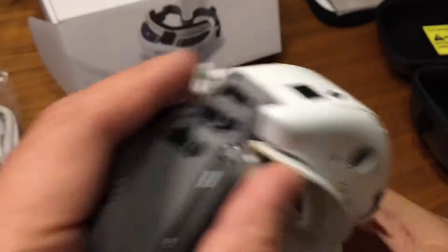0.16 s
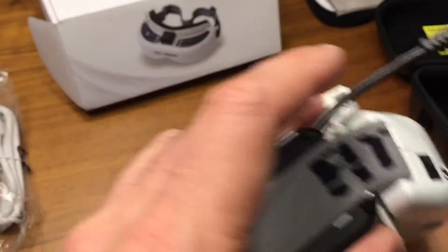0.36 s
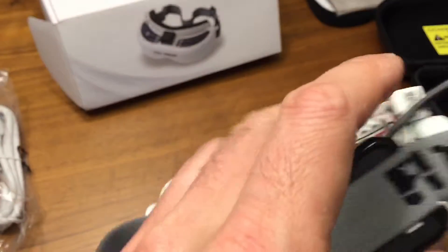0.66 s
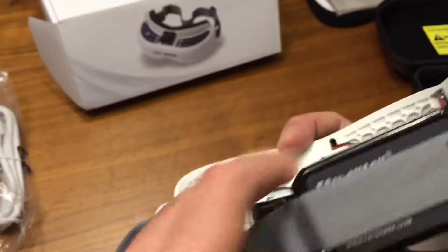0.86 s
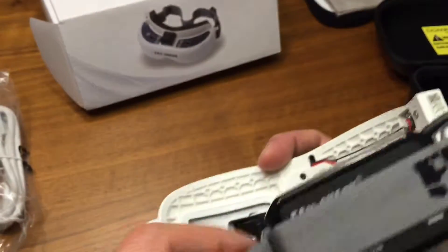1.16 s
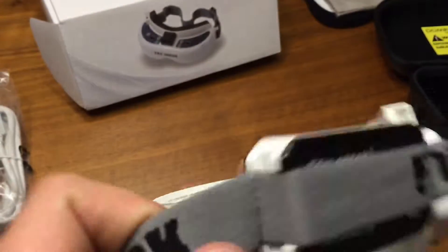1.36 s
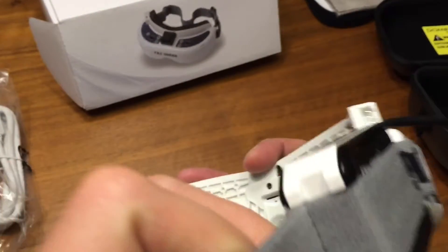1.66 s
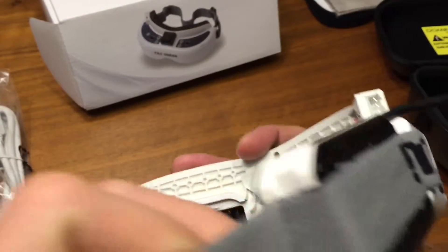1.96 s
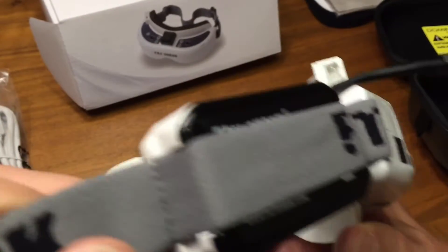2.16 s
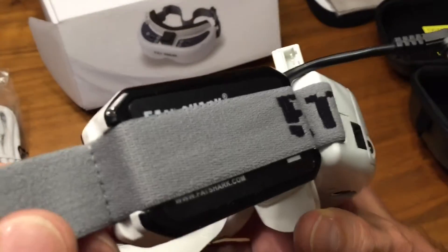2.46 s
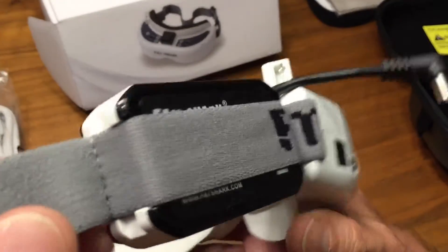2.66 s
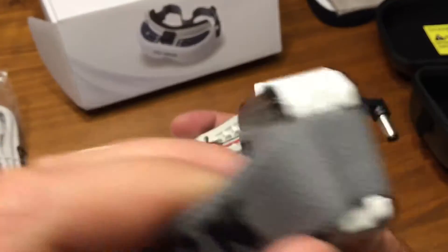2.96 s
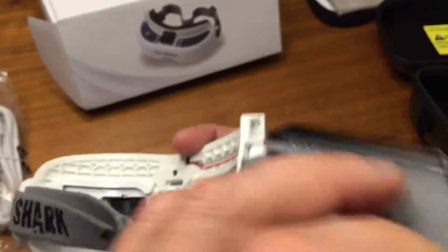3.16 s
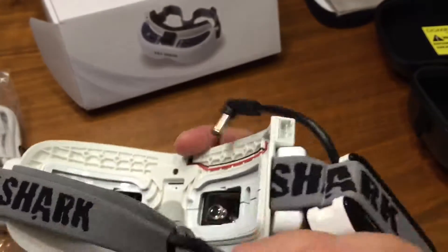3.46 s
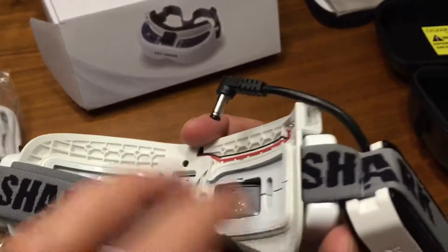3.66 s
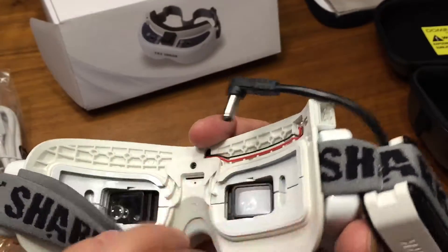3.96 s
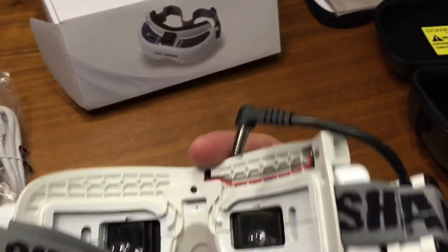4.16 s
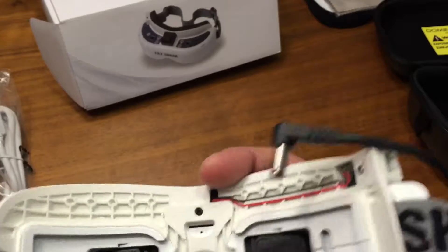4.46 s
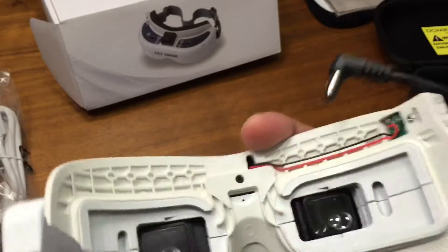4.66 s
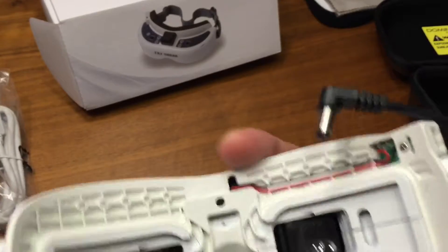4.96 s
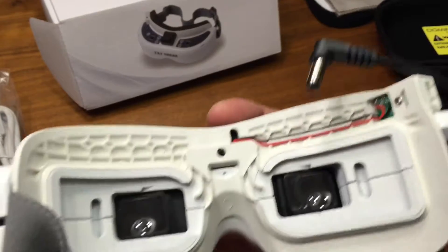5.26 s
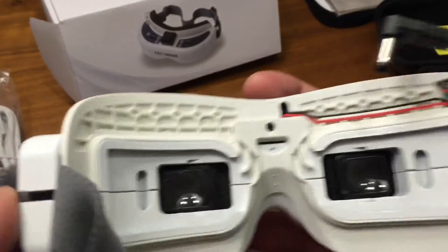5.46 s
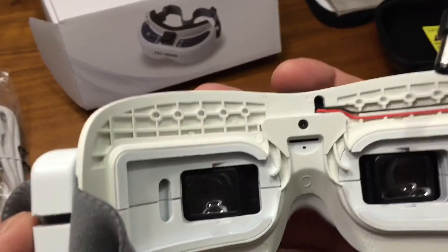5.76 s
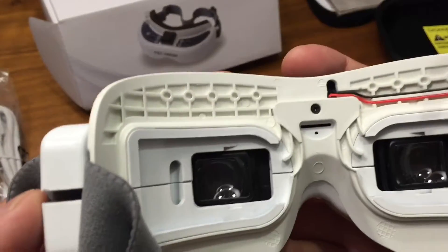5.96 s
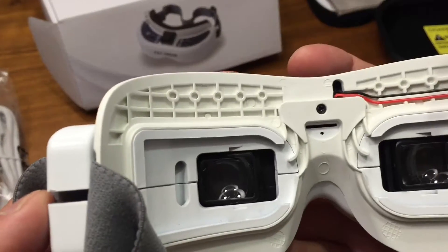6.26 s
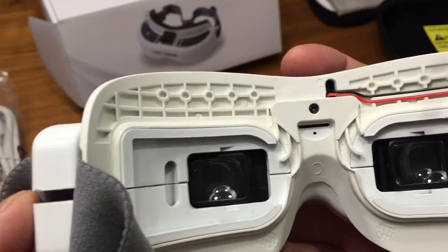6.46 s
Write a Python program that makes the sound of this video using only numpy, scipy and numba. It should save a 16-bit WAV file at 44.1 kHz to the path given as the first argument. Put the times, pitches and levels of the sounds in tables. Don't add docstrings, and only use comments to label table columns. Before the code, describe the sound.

Close to a phone in a small room, hands turn hard plastic goggles over. Faint, jerky rubs ring the shell with a few light clicks. After a quieter spell, a case knocks in the hand, then breaks loose in a loud, bright clatter with quick bounces. Afterwards come drier strap hiss, short scrapes, a firm knock and soft bumps, thinning out over low hum and microphone hiss.

```python
import sys
import numpy as np
from scipy import signal
from scipy.fft import rfft, irfft
from scipy.io import wavfile
from scipy.ndimage import uniform_filter1d
from numba import njit

SR = 44100
rng = np.random.default_rng(int(sys.argv[2]) if len(sys.argv) > 2 else 0)


def bounce(signal):
    frames = np.transpose(np.atleast_2d(signal))
    limited = np.clip(frames, -1, 1)
    pcm = np.round(limited * 32767).astype(np.int16)
    wavfile.write(sys.argv[1], SR, pcm)


def gain_from_db(level_db):
    decades = np.asarray(level_db, float) / 20
    return 10 ** decades


N = 291942
T = np.arange(N) / SR

# [f/Hz, width/Hz, level/dB]
PANELS = [(820, 280, -6.5), (1210, 180, 4.5), (1613, 250, -8), (1850, 260, 1.5), (2250, 280, 7.5)]
SHELL = [(2900, 230, 6), (3450, 740, 5.5), (4200, 430, 4), (4950, 600, -1.5)]
RIBS = [(5820, 1500, 4.5), (6800, 660, -6), (8700, 2400, 1.5)]
FIBRES = [(11770, 1900, 2.5), (13600, 1500, 0), (15200, 2500, -1.5)]
# [t/s, panel f/Hz, shell f/Hz, panels against shell level/dB]
GRIP = [(.1, 1500, 3494, 2.5), (.42, 1940, 3404, -2.5), (.8, 2050, 3918, 5), (0.881, 2100, 5000, -3),
        (1.029, 2200, 3400, 1), (1.2, 1350, 3483, -4.5), (1.6, 1450, 3670, -0.5), (2.7, 1500, 3470, -5.5),
        (3.0, 1109, 3200, 1.5), (3.131, 1250, 4200, -4.5), (3.26, 2180, 3450, 1.5),
        (3.451, 1850, 3600, -0.5), (3.97, 1427, 2900, -2.5), (4.47, 2250, 3490, 3.5),
        (4.64, 1775, 3807, 3.5), (4.74, 1500, 4200, -1), (5.03, 1610, 4200, -1.5), (5.55, 2300, 3310, -3)]
# [t/s of full pressure, ring level/dB,
# swell t/s, fade t/s, fibre hiss against ring level/dB]
STROKES = [(.002, -63, .05, 0.12, -10.5), (0.069, -71, 0.058, 0.6, -6), (.14, -70, 0.27, 0.031, 7),
           (0.384, -61, 0.037, 0.056, -17.5), (0.456, -61, 0.046, 0.059, -21),
           (.57, -75, 0.11, 0.17, -18), (.658, -69.5, 0.067, 0.071, 2), (.74, -78, 0.062, .2, -17),
           (.81, -67.5, 0.19, 0.11, -4.5), (0.862, -60.5, .04, 0.084, -1),
           (.95, -69, 0.14, 0.12, -10), (1.014, -58, 0.039, 0.05, -7.5),
           (1.09, -69, 0.11, 0.017, -10), (1.212, -65.5, 0.11, 0.26, -11.5),
           (1.318, -64, 0.21, 0.092, -11), (1.416, -65, 0.1, 0.038, -10),
           (1.47, -68.5, .1, 0.045, -3), (1.502, -62.5, 0.0098, 0.15, -7.5),
           (1.6, -73, .3, 0.028, -10), (1.82, -78, .8, 0.44, -8), (2.186, -75, 0.19, 0.027, -13),
           (2.674, -66.5, .012, 0.091, -28), (2.739, -59, 0.083, 0.051, -5.5),
                    (2.909, -64.5, 0.043, 0.12, -0.5), (2.961, -62, .07, 0.072, -18),
                    (3.05, -57, 0.04, 0.35, -9), (3.155, -51, 0.2, .065, -10),
                    (3.25, -45, 0.028, 0.075, -25.5), (3.32, -45.5, 0.19, 0.069, -13),
                    (3.373, -39.5, 0.019, 0.081, -9), (3.44, -55.5, .2, 0.117, -14.5),
                    (3.49, -52, .1, 0.049, -22), (3.6, -80.5, 0.25, .1, -6.5),
                    (3.96, -59, 0.027, 0.039, -7), (4.001, -58.5, 0.056, 0.025, -1.5),
           (4.208, -73.5, 0.02, .05, -12), (4.27, -76, 0.044, 0.39, -4),
                    (4.39, -73.5, 0.49, 0.066, 0.5), (4.483, -68, .03, 0.32, 5),
                    (4.51, -60, 0.026, 0.027, 8.5), (4.55, -60.5, 0.11, 0.074, -7),
                    (4.624, -52.5, 0.042, 0.064, -4), (4.714, -48.5, 0.045, 0.06, -5.5),
                    (4.76, -54, 0.089, 0.016, -0.5), (4.8, -72.5, .1, .15, -14),
                    (4.851, -52, 0.014, 0.027, -8), (4.889, -67.5, 0.14, 0.067, 1),
                    (4.97, -68, 0.12, .08, -1), (5.032, -56, 0.037, 0.014, -1.5),
                    (5.086, -63, 0.012, 0.02, 9), (5.142, -69.5, 0.2, 0.06, 9.5),
                    (5.269, -69.5, 0.55, 0.032, -6), (5.32, -74, 0.28, .3, -2),
                    (5.409, -68.5, 0.064, 0.21, 4), (5.523, -64, 0.068, 0.077, 7.5),
                    (5.568, -60.5, 0.094, .065, -5), (5.636, -73, 0.0079, .015, 6)]
# [t/s, peak level/dB, favoured f/Hz, low level/dB, treble level/dB]
TICKS = [(0.0419, -32, 4850, -15, 1.5), (0.665, -33.5, 3930, -11.5, -3.5), (1.2068, -45.5, 3250, -9, -13),
         (1.2257, -57, 3100, 5, -10), (1.4092, -47.5, 3550, -24, -17), (1.517, -50.5, 6950, -6, 5.5),
         (2.669, -64, 1660, 10, -9), (2.6917, -51, 2070, 1, -15), (2.7259, -53, 2700, -15, -7),
         (2.9082, -50, 1140, 14, -8), (3.0173, -53, 1010, 11.5, -3), (3.6302, -59, 1010, 2, -22),
         (3.8661, -55, 1170, -9, -6.5), (3.8998, -55, 2600, -17.5, 1.5), (3.982, -47.5, 5400, 1, 9),
         (4.003, -52, 5540, 5, 9.5), (4.262, -52.5, 2280, -11, -3.5), (4.7458, -48, 6930, -9, 7.5),
         (5.0832, -49, 5200, -17.5, 5), (5.27, -45.5, 3320, -21, -9)]
# [t/s, peak level/dB, favoured f/Hz, low level/dB, treble level/dB]
KNOCKS = [
    (3.0488, -33.5, 3070, -16, -19),
    (3.0658, -35.5, 3250, -7.5, -17.5),
    (3.1376, -32.5, 2690, -6, -13.5),
    (3.1528, -38, 3370, -10.5, -7),
    (3.1722, -29.5, 1125, -4, -3),
    (3.205, -36.5, 2843, -14.5, -16),
    (4.762, -43.5, 1683, 5.5, 4.5),
    (4.8569, -27, 2690, -7, -7.5),
]
# [t/s, peak level/dB, favoured f/Hz, low level/dB, treble level/dB]
CLATTER = [(3.2204, -7, 3430, -25, -13.5), (3.2308, -15.5, 3500, -23, -11), (3.235, -21, 3210, -22.5, -12),
           (3.239, -22, 3480, -19.5, -16), (3.298, -23.5, 6900, -19, 5), (3.3014, -21, 3300, -23.5, -6),
           (3.31, -21.5, 4020, -18.5, -10), (3.3379, -38, 1120, 0.5, -7), (3.35, -9.5, 5800, -12.5, 4.5),
           (3.3573, -29, 1758, -5.5, 1.5), (3.3627, -21.5, 5800, -3, 9.5),
           (3.3964, -23.5, 1720, -12.5, -1.5), (3.3971, -15.5, 1780, -6.5, -12),
           (3.447, -29, 1740, -4.5, -9.5), (3.473, -39, 1984, 6.5, -5.5)]
# [f/Hz, level/dB per Hz]
PLASTIC = [(590, -37), (1000, -10.5), (1370, -6.5), (1700, -2.5), (2980, -6.5), (3630, -2), (4820, -4.5),
           (5610, -9.5), (6850, -6.5), (7970, -11), (9070, -7), (10200, -15.5), (11700, -11.5),
           (15000, -17.5), (16500, -33)]
# [t/s, peak level/dB, f/Hz, time to fall 60 dB t/s]
BUMPS = [(0.56, -49.5, 196, 0.073), (1.005, -56, 603, 0.062), (1.212, -57, 385, 0.11),
         (1.391, -53, 902, 0.034), (2.906, -33.5, 723, 0.031), (2.912, -39, 1060, 0.046),
         (3.172, -41, 400, 0.019), (3.205, -39.5, 234.3, .04), (4.549, -53.5, 194, 0.17),
         (4.629, -53, 70.5, 0.16), (4.716, -24, 480, 0.004), (4.763, -32.5, 114, 0.08),
         (4.855, -44, 485, 0.013), (5.242, -42.5, 487, 0.0082), (5.241, -49.5, 1040, 0.024)]
# [f/Hz, time to fall 60 dB t/s, level/dB]
ROOM = [(700, 0.12, -15.5), (1500, 0.22, -31.5), (2780, 0.15, -26.5), (6040, .32, -21.5),
        (12000, 0.15, -25.5)]
# [f/Hz, level/dB per Hz]
HOUSE = [(12, -66.5), (20, -31.5), (29, -44.5), (44, -5.5), (118, -8.5), (157, -2.5), (248, -11),
         (274, -12.5), (464, -19.5), (506, -21), (600, -29), (780, -48.5), (1320, -120)]
# [f/Hz, level/dB per Hz]
HISS = [(350, -33), (600, -1.5), (739, -5), (885, -5.5), (1300, -6), (1420, -10), (1540, -7), (1820, -7.5),
        (3000, -9.5), (3790, -11), (4800, -12), (5520, -12), (8840, -16), (15200, -18.5), (16500, -34.5)]
# [f/Hz, width/Hz, level/dB]
MIC_DIPS = [(4900, 370, -2.5), (10460, 600, -4)]

HOUSE_DB, HISS_DB = -69.5, -73
STROKE_DROP_DB = 20
RIB_DB, RIB_PER_FIBRE = 3, 0.63
PANEL_FOLLOW, PANEL_EVEN_DB = 0.8, -61
FLEX = 0.035
WAVER_DB = 3.4
FREE_DB, FREE_WIDTH = -5, 0.1
TICK_T60_S, KNOCK_T60_S, CLATTER_T60_S = 0.023, 0.0105, 0.022


def rubbing():
    push = rng.standard_normal(N)
    jerk_db = 2.2 * np.minimum(rng.exponential(size=N // 12 + 1), 5)
    size = np.repeat(gain_from_db(jerk_db), 12)[:N]

    def jerks():
        return size * np.roll(push, rng.integers(N))

    grip_db = 0.55 * walk(60) + 0.92 * walk(200)
    ring_db, fibre_db = pressure()
    grip_s, panel_hz, shell_hz, panel_db = np.transpose(GRIP)
    lag_db = (PANEL_FOLLOW - 1) * np.maximum(ring_db - PANEL_EVEN_DB, -3)
    groups = [(SHELL, 0, np.interp(T, grip_s, shell_hz)),
              (PANELS, np.interp(T, grip_s, panel_db) + lag_db, np.interp(T, grip_s, panel_hz)),
              (RIBS, RIB_DB + RIB_PER_FIBRE * fibre_db, None),
              (FIBRES, fibre_db, None)]
    out = 0
    for modes, group_db, free_hz in groups:
        flex = 1 + FLEX * walk(9) * (modes is not FIBRES)
        body, power = 0, 0
        for hz, width_hz, db in modes:
            damped_db = 0
            if free_hz is not None:
                damped_db = np.minimum(18 * abs(np.log2(hz / free_hz)), 8.5)
            gain = gain_from_db(db - damped_db + WAVER_DB * walk(18))
            mode = gliding_ring(jerks(), hz * flex, width_hz / hz)
            body = body + gain * unit(ring(mode, hz, 4.5 * width_hz))
            power = power + gain ** 2
        body = body / np.sqrt(power)
        if free_hz is not None:
            song = gliding_ring(jerks(), free_hz, FREE_WIDTH)
            body = body + gain_from_db(FREE_DB + WAVER_DB * walk(23)) * unit(song)
        out = out + body * gain_from_db(ring_db + group_db + grip_db)
    return out


def pressure():
    t = T[::32]
    ring_power, fibre_sum = 1e-12, 0
    for s, db, swell_s, fade_s, fibre_db in STROKES:
        away = np.maximum((s - t) / swell_s, (t - s) / fade_s)
        power = gain_from_db(2 * (db - STROKE_DROP_DB * away))
        ring_power = ring_power + power
        fibre_sum = fibre_sum + power * fibre_db
    return np.interp(T, t, 10 * np.log10(ring_power)), np.interp(T, t, fibre_sum / ring_power)


def clicks():
    out = np.zeros(N)
    for rows, t60 in ((TICKS, TICK_T60_S), (KNOCKS, KNOCK_T60_S), (CLATTER, CLATTER_T60_S)):
        for s, db, hz, low_db, high_db in rows:
            add(out, s - 0.0003, gain_from_db(db) * contact(hz, low_db, high_db, t60))
    return signal.sosfilt(signal.butter(4, 850, "high", fs=SR, output="sos"), out)


def contact(hz, low_db, high_db, t60):
    t = np.arange(2048) / SR
    spread, size, phase = rng.random((3, 70))
    f = 1000 + 15300 * np.linspace(0, 1, num=70) ** 1.5 + 200 * (spread - 0.5)
    plastic_hz, plastic_db = np.transpose(PLASTIC)
    gain = gain_from_db(np.interp(np.log(f), np.log(plastic_hz), plastic_db) - 2.6 * size)
    nearby = abs(np.log(f / hz)) < 0.3
    gain = np.append(gain, gain_from_db(8.5 - 0.45 * high_db) * gain[nearby].max())
    f, phase = np.append(f, hz), np.append(phase, 0)
    fade = np.log(1000) / (t60 * (3000 / f) ** 0.6)
    waves = np.sin(2 * np.pi * (f[:, None] * t + phase[:, None]))
    modes = gain[:, None] * waves * np.exp(-fade[:, None] * t)
    low, high = f < 2000, f >= 5500
    out = 0
    for group, db in ((low, low_db), (~low & ~high, 0), (high, high_db)):
        part = modes[group].sum(axis=0) * np.minimum(t / 0.000083, 1)
        out = out + gain_from_db(db) * part / abs(part).max()
    return out


def bumps():
    out, t = np.zeros(N), np.arange(8192) / SR
    for s, db, hz, t60 in BUMPS:
        modes = 0
        for ratio, mode_db in ((1, 1.0), (0.584, -8), (1.3, -6.5)):
            modes = modes + gain_from_db(mode_db) * np.sin(2 * np.pi * hz * ratio * t)
        swell = 1 - np.exp(-4 * hz * t)
        add(out, s, gain_from_db(db - 3.0) * modes * swell * np.exp(-np.log(1000) * t / t60))
    return out


def room(x):
    t = np.arange(SR // 2) / SR
    tail = 0
    for hz, t60, db in ROOM:
        band = unit(ring(rng.standard_normal(len(t)), hz, hz * 1.2))
        tail = tail + gain_from_db(db) * band * np.exp(-np.log(1000) * t / t60)
    onset = np.clip((t - 0.002) / 0.0048, 0, 1)
    return signal.fftconvolve(x, tail * onset * gain_from_db(-25))[:N]


def house_hum():
    return gain_from_db(HOUSE_DB + 0.47 * walk(0.42) + 0.8 * walk(27)) * coloured(HOUSE)


def microphone_hiss():
    return gain_from_db(HISS_DB + 0.41 * walk(0.7)) * coloured(HISS)


def unit(x):
    return x / np.sqrt(np.mean(x ** 2))


def ring(x, hz, width_hz):
    return signal.lfilter(*signal.iirpeak(hz, hz / width_hz, fs=SR), x)


@njit
def gliding_ring(x, hz, sharp):
    y, band, low = np.empty(len(x)), 0., 0.
    for i in range(len(x)):
        g = np.tan(np.pi * hz[i] / SR)
        v = (band + g * (x[i] - low)) / (1 + g * (g + sharp))
        band = 2 * v - band
        low = low + 2 * g * v
        y[i] = sharp * v
    return y


def add(out, s, sound):
    i = int(s * SR)
    out[i:i + len(sound)] += sound[:N - i]


def walk(rate):
    k = int(SR / rate)
    steps = np.repeat(rng.standard_normal(N // k + 1), k)
    return 1.3 * uniform_filter1d(uniform_filter1d(steps, k), k)[:N]


def coloured(points):
    hz, db = np.transpose(points)
    f = np.maximum(np.arange(N // 2 + 1) * SR / N, 1)
    shape = gain_from_db(np.interp(np.log(f), np.log(hz), db, -90, -90))
    return unit(irfft(rfft(rng.standard_normal(N)) * shape, N))


def top_in_attacks(x):
    body = irfft(rfft(x) * (np.arange(N // 2 + 1) * SR / N < 15800), N)
    power = uniform_filter1d(np.diff(x, prepend=0) ** 2, size=128)
    attack = power > 8 * uniform_filter1d(power, size=2048)
    opening = np.minimum(8 * uniform_filter1d(1. * attack, size=128), 1)
    return body + (x - body) * opening


def scene():
    soft = rubbing()
    hard = clicks() + bumps()
    echoes = room(hard + gain_from_db(-5.5) * soft)
    return (soft + hard + echoes + house_hum())[None]


def top_cut(x):
    return signal.sosfilt(signal.butter(12, 16830, fs=SR, output="sos"), x)


def record(dry):
    x = dry[0]
    for hz, width_hz, db in MIC_DIPS:
        x = x + (gain_from_db(db) - 1) * ring(x, hz, width_hz)
    x = x + microphone_hiss()
    x = signal.sosfilt(signal.butter(3, 42, "high", fs=SR, output="sos"), x)
    mix = top_in_attacks(x)[None]
    return top_cut(mix)


dry = scene()
out = record(dry)
bounce(out)
```